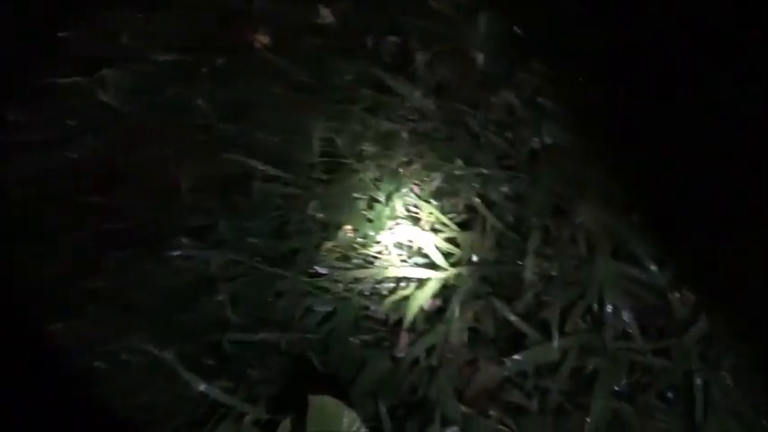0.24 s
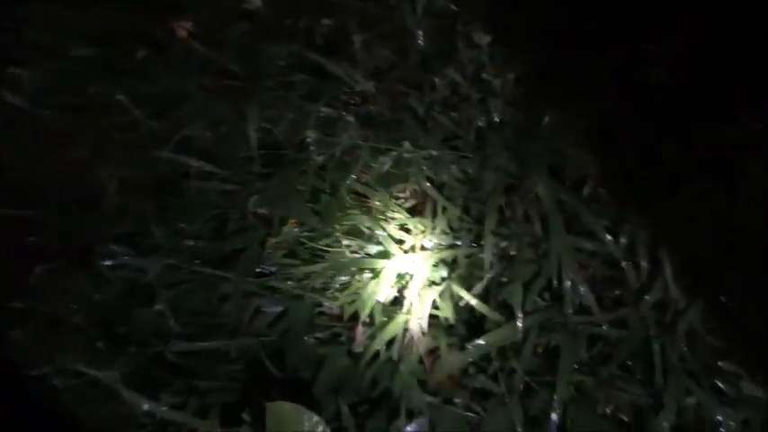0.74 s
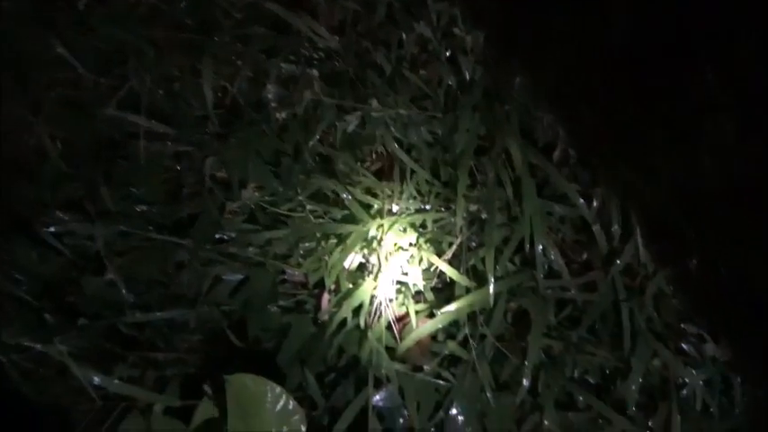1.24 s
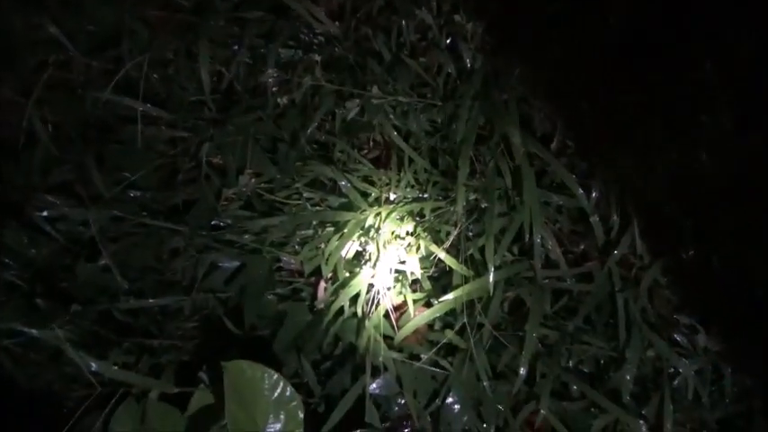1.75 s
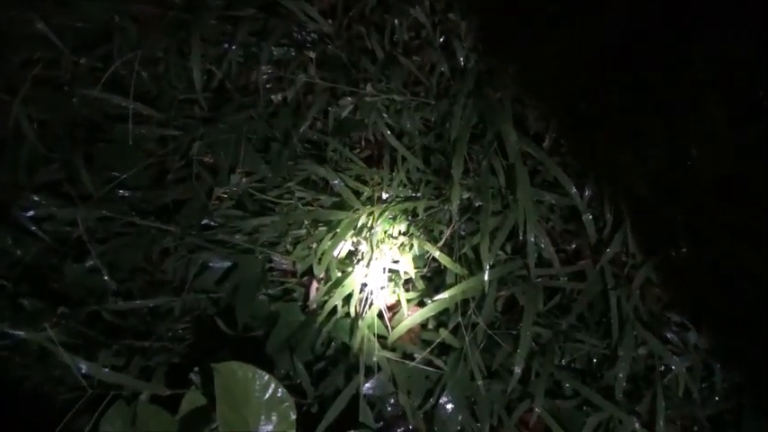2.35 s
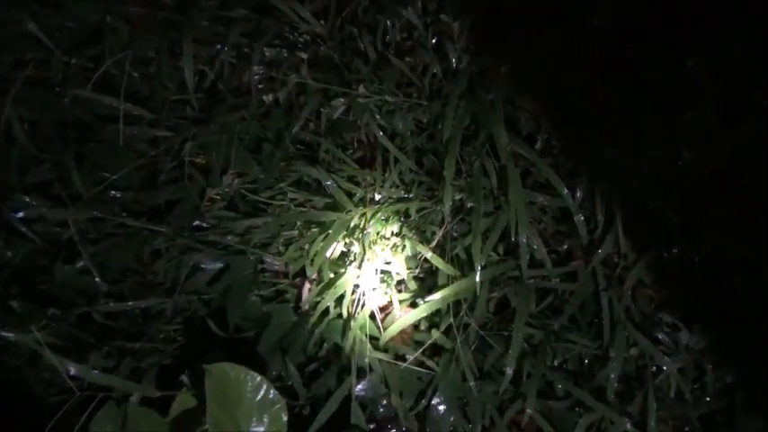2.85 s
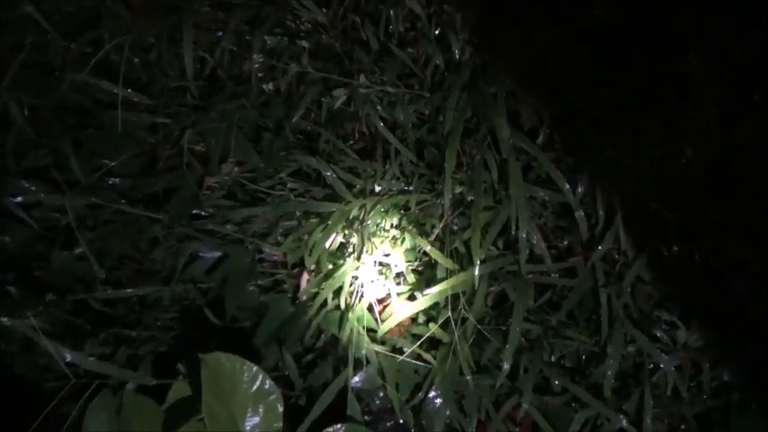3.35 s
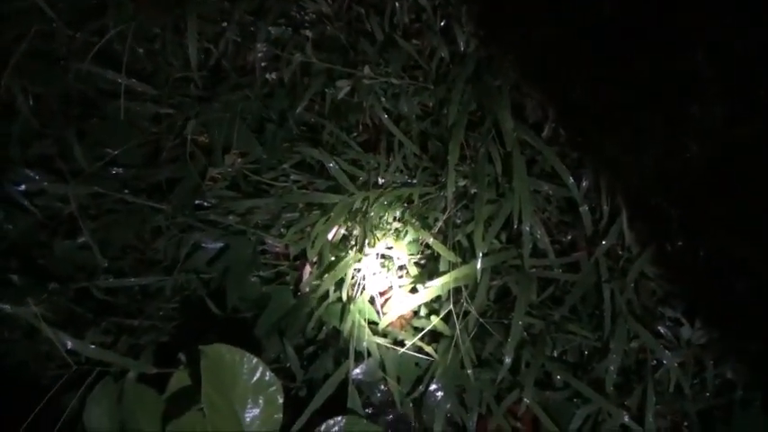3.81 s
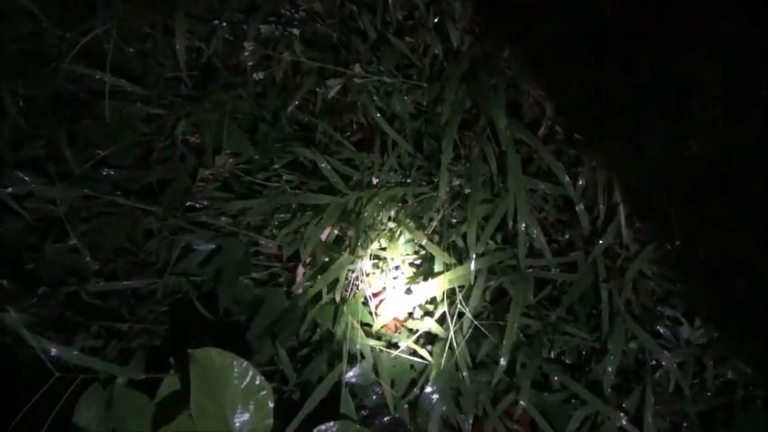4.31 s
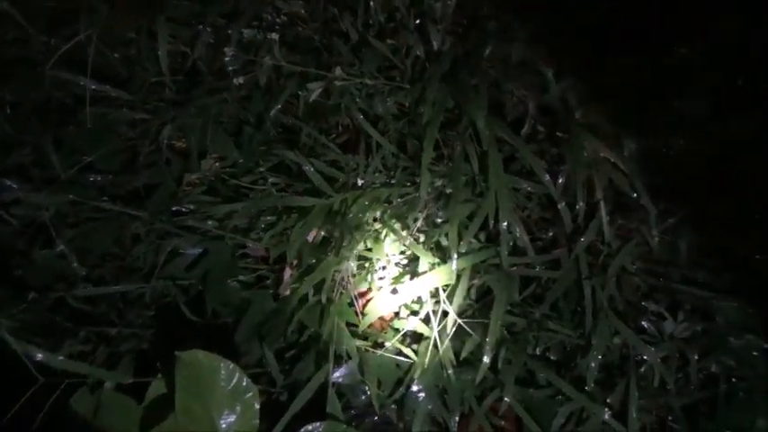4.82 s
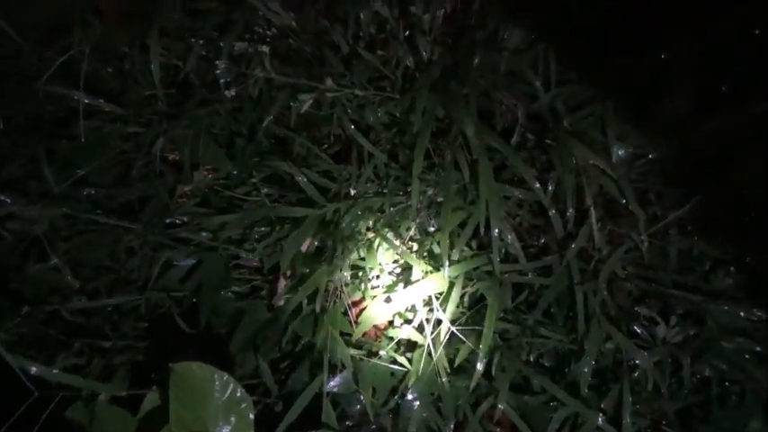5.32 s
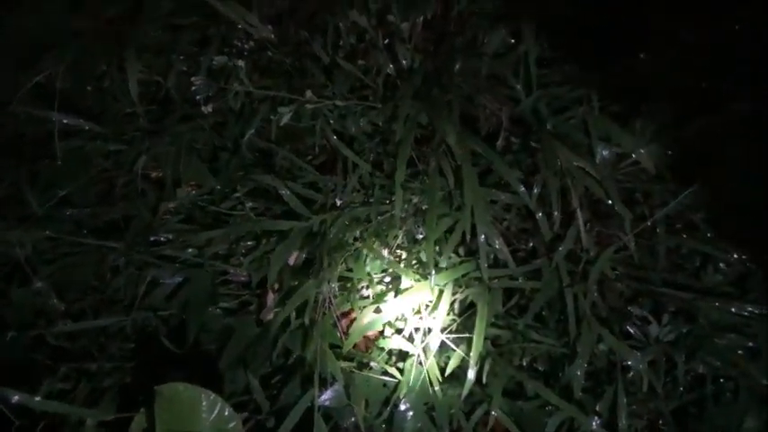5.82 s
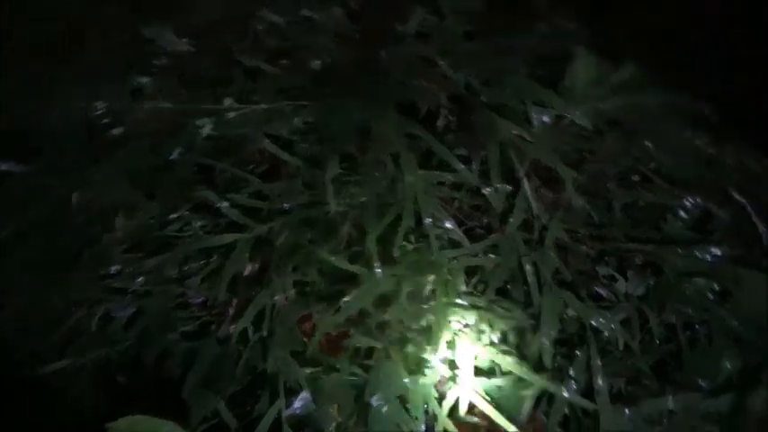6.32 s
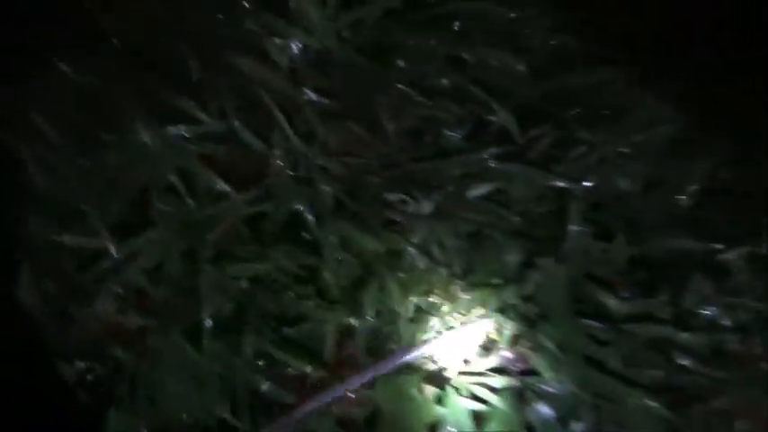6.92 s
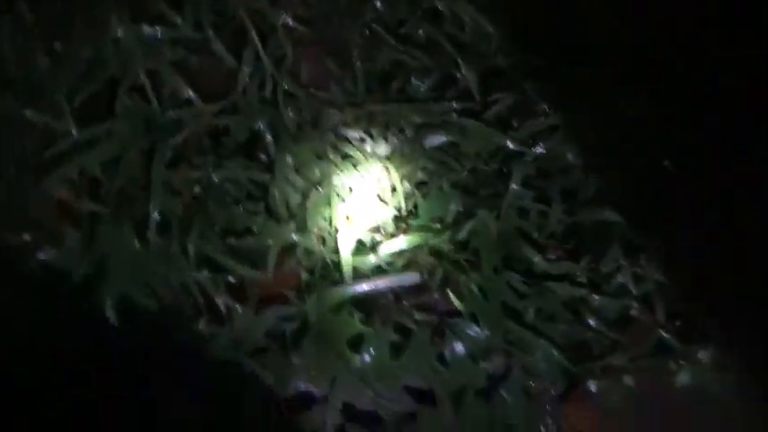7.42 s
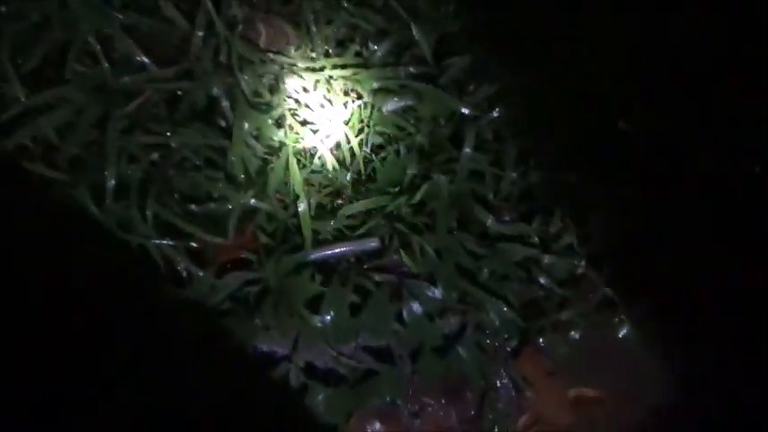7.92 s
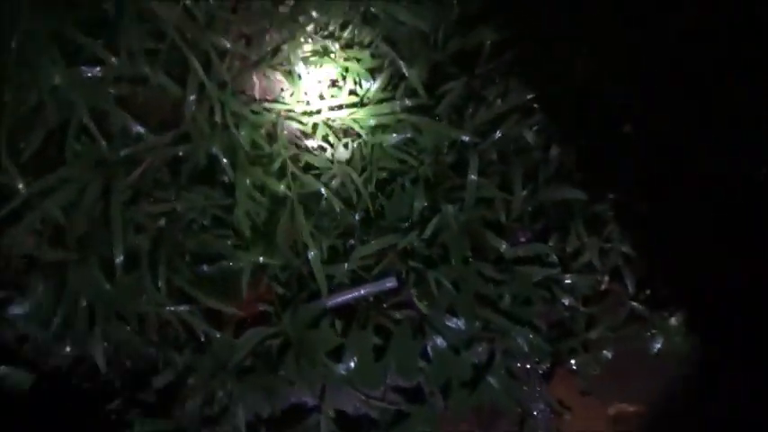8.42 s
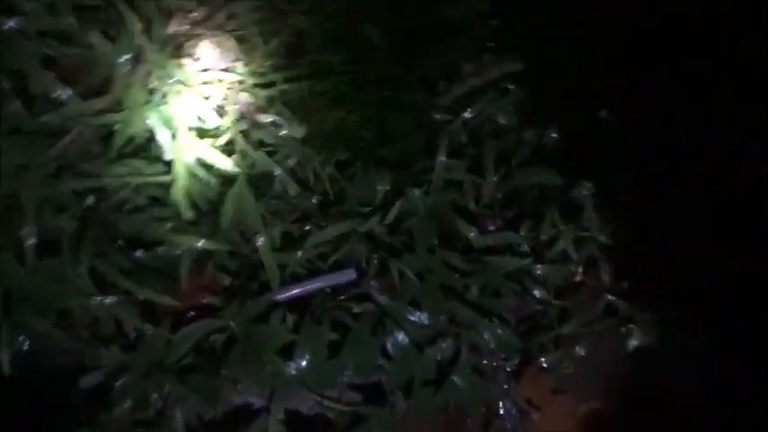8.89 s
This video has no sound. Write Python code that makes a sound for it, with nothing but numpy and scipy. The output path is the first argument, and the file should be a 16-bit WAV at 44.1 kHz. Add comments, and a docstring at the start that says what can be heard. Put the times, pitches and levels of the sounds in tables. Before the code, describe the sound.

A person stands in rain beside wet grass, the stereo microphone close to their jacket. Fine hiss and soft patter continue throughout over a faint electrical hum. Low thunder rumbles soon after the start, leaning left, with bumping claps, and a second long peal comes midway. It dwindles as drops thump on cloth, the jacket rustles abruptly, a short rumble follows, and one loud dull thud lands near the end.

```python
"""Night rain on grass and leaves from start to end: a noise wash with single drops, puddle plinks and mains hum.
From about one second thunder rolls: noise bands under peal envelopes, with claps of a few low cycles.
A second long peal follows past four seconds and a small one past seven, over a roll that slowly fades.
A rain jacket swishes in bursts of tiny slips, most strongly near seven seconds, as its wearer turns.
Fat drops thud on taut cloth as short sinking tones, near six and again past eight and a half seconds."""
import sys
import numpy as np
from scipy import signal
from scipy.fft import rfft, irfft, next_fast_len
from scipy.io import wavfile
from scipy.ndimage import uniform_filter1d, map_coordinates

SR = 44100
rng = np.random.default_rng(int(sys.argv[2]) if len(sys.argv) > 2 else 0)


def put_to_file(sound):
    """Save the sound as 16-bit audio at rate SR, in the file named by the first command-line argument."""
    columns = np.atleast_2d(sound).T  # one column per channel
    safe = np.clip(columns, -1, 1)
    whole_steps = np.round(safe * 32767)
    wavfile.write(sys.argv[1], SR, whole_steps.astype(np.int16))


N = 403515  # length in samples


def amp(db):
    """Decibels to gain."""
    return 10 ** (np.asarray(db) / 20)


def unit(x):
    """Scale to rms 1."""
    return x / np.sqrt(np.mean(x ** 2) + 1e-20)


def along(points, hz):
    """Read a (Hz, value) curve on a log frequency axis."""
    point_hz, value = np.transpose(points)
    return np.interp(np.log(hz + 1), np.log(point_hz + 1), value)


def curves(rows):
    """One value per sample for each column after the time."""
    time_s, *columns = np.transpose(rows)
    return [np.interp(np.arange(N) / SR, time_s, column) for column in columns]


def wobble(rate_hz):
    """A smooth random curve with rate_hz knots a second."""
    knots = rng.standard_normal(int(N * rate_hz / SR) + 4)
    return map_coordinates(knots, [np.arange(N) * rate_hz / SR])


def filtered(x, response):
    """Shape a sound by a response of frequency, padded so that no tail wraps round."""
    padded = next_fast_len(N + SR // 2)
    hz = np.fft.rfftfreq(padded, 1 / SR)
    return irfft(rfft(x, padded) * response(hz), padded)[..., :N]


def coloured(x, spectrum):
    """Give a sound a spectrum, at rms 1."""
    return unit(filtered(x, lambda hz: amp(along(spectrum, hz))))


def panned(db):
    """Left and right gains for a level difference; positive leans left."""
    return amp(np.outer([.5, -.5], db))


def add(track, start_s, sound):
    """Mix a sound into the track at a moment."""
    part = track[..., max(round(start_s * SR), 0):][..., :sound.shape[-1]]
    part += sound[..., :part.shape[-1]]


def swell(middle_s, length_s):
    """A bell-shaped rise and fall around a moment."""
    return np.exp(-2 * ((np.arange(N) / SR - middle_s) / length_s) ** 2)


def impacts(rate_hz, spread_db):
    """Impulses at random moments with log-normal sizes (tails clipped) and random signs, rms 1."""
    chance, size = rng.random(N), rng.standard_normal(N)
    struck = chance < rate_hz / SR
    sign = rng.choice([-1, 1], N)
    return unit(struck * amp(spread_db * np.clip(size, -2, 2)) * sign)


# mains hum partials: pitch_hz [Hz], level_db [dB]
HUM_PARTIALS = [(60, -52), (120, -45.5), (300, -51.5)]


def hum():
    """A faint mains hum: sine partials whose levels waver slightly."""
    t = np.arange(N) / SR
    return sum(amp(level_db + 0.43 * wobble(2.5)) * np.sin(2 * np.pi * pitch_hz * t)
               for pitch_hz, level_db in HUM_PARTIALS)


# how alike the rain is in both ears: pitch_hz [Hz], likeness [0 to 1]
RAIN_LIKENESS = [(60, 1), (200, 1), (400, 1), (850, 0.57), (2000, 0.49), (4900, 0.54), (9000, 0.71)]


def wash(spectrum, rate_hz, spread_db):
    """Countless drops from all around; the two microphones share only part of them."""
    pair = np.array([impacts(rate_hz, spread_db), impacts(rate_hz, spread_db)])

    def mid_side(hz):
        # less likeness turns more of the power into the side signal
        turn = np.arccos(np.clip(along(RAIN_LIKENESS, hz), 0, 1)) / 2
        return amp(along(spectrum, hz)) * [np.cos(turn), np.sin(turn)]

    mid, side = filtered(pair, mid_side)
    return unit(np.array([mid + side, mid - side]))


# strength of the rain wash, with a short swell of cloth rustle near 6.9 s, before trims:
# time_s [s], patter_db [dB], hiss_db [dB]
WASH_STRENGTH = [(0.0, -40, -41.5), (0.48, -39.5, -43), (2.83, -38, -42.5), (4.79, -39, -42.5),
                 (6.55, -38.5, -42), (6.86, -37, -37), (7.44, -38, -42.5), (9.15, -37.5, -41)]
# tone of the drops on soil and leaves: pitch_hz [Hz], level_db [dB per Hz]
PATTER_SPECTRUM = [(25, -8), (45, -1), (95, -6.5), (160, 6), (210, 1.5), (320, 1), (480, 3), (750, 2.5),
                   (1200, 2), (2000, 0), (3000, -2.5), (4200, -7), (5500, -16.5), (8000, -41)]
# tone of the drops on grass blades: pitch_hz [Hz], level_db [dB per Hz]
HISS_SPECTRUM = [(2500, -8), (4200, 0), (5100, 0.5), (5900, 1.1), (6700, 2), (8700, 2), (9800, -0.5),
                 (10700, -3), (11100, -16.5)]


def far_rain():
    """Patter on soil and leaves and a finer hiss on grass; a brief swell stands for the jacket's rustle."""
    patter_db, hiss_db = curves(WASH_STRENGTH)
    flow_db = 0.37 * wobble(2.7) + 0.5 * wobble(16)  # both layers ebb together
    patter_gain = amp(patter_db + 1.83 + flow_db + 0.49 * wobble(35))
    hiss_gain = amp(hiss_db + 1.5 + flow_db + 0.5 * wobble(30))
    patter = patter_gain * wash(PATTER_SPECTRUM, rate_hz=4000, spread_db=2.5)
    hiss = hiss_gain * wash(HISS_SPECTRUM, rate_hz=10000, spread_db=5.0)
    return patter * panned(-2.0) + hiss * panned(0.15)


def bubble(pitch_hz, t60_s, scatter):
    """A bubble rings briefly, wavering, and rises in pitch as it nears the surface."""
    t = np.arange(SR // 6) / SR
    waver = signal.resample(rng.standard_normal(150), len(t))
    glide = 1 + 0.65 * t + scatter * waver
    phase = 2 * np.pi * np.cumsum(pitch_hz * glide) / SR
    return amp(-60 * t / t60_s) * (1 - np.exp(-t / 0.002)) * np.sin(phase)


# clear plinks: start_s [s], level_db [dB], pitch_hz [Hz, at the start], t60_s [s], scatter [share of pitch]
PUDDLE_PLINKS = [(0.466, -25, 830, 0.043, .05), (0.744, -20, 510, 0.028, 0.11),
                 (2.644, -28.5, 1300, 0.13, .02), (3.324, -22, 1400, 0.036, 0.054),
                 (5.062, -30, 1450, 0.15, .04), (6.014, -25, 1360, 0.072, 0.12),
                 (6.085, -29, 726, 0.076, 0.1), (8.549, -24, 2160, .1, 0.1),
                 (8.558, -31, 3000, 0.11, 0.137), (8.573, -27, 1900, 0.12, 0.093),
                 (8.584, -31, 2016, .13, .09)]


def puddles(count=70):
    """Bubbles ring in puddles: a few clear plinks close by, and many faint ones all around."""
    out = np.zeros((2, N))
    for start_s, level_db, pitch_hz, t60_s, scatter in PUDDLE_PLINKS:
        add(out, start_s, amp(level_db) * bubble(pitch_hz, t60_s, scatter))
    starts_s = rng.random(count) * N / SR
    traits = np.clip(rng.standard_normal((count, 3)), -2, 2)
    for start_s, (size, pitch, side) in zip(starts_s, traits):
        plink = bubble(1500 * np.exp(.4 * pitch), t60_s=0.062, scatter=.05)
        add(out, start_s, amp(-37.5 + 1.5 * size) * panned(-1.5 + 3 * side) * plink)
    return out


def drop(pitch_hz, shake_db, splash_db, shake_t60_s, splash_t60_s):
    """A drop slaps and briefly shakes a leaf, through its broad resonance, and sprays droplets."""
    t = np.arange(SR // 25) / SR
    shake, spray = rng.standard_normal((2, len(t)))
    band_hz = np.clip([0.61 * pitch_hz, 1.39 * pitch_hz], 50, .45 * SR)
    leaf = signal.butter(2, band_hz, "bandpass", fs=SR, output="sos")
    slap = signal.sosfilt(leaf, signal.unit_impulse(len(t)))
    slap = 0.89 * slap / np.abs(slap).max()
    shake = unit(signal.sosfilt(leaf, shake)) * amp(shake_db - 60 * t / shake_t60_s)
    shake *= 1 - np.exp(-pitch_hz * t)  # the shake builds up after the slap
    spray = unit(np.diff(spray, prepend=0)) * amp(splash_db + 7.5 - 60 * t / splash_t60_s)
    return slap + shake + spray


# drops on near leaves: start_s [s], level_db [dB], pitch_hz [Hz, of the leaf],
# shake_db and splash_db [dB, relative to the drop, splash before its trim], pan_db [dB, left over right]
LEAF_DROPS = [(0.355, -18, 2470, -5.5, -28, -6), (0.471, -20, 1720, -12, -18, -3),
              (0.5452, -17, 6000, -16, -20, -1), (1.286, -24, 2100, -7, -24, 13),
              (1.316, -23, 2900, -5, -11.5, -10), (1.49, -18, 2100, -8, -19, -1),
              (2.829, -23, 3600, -10, -22, -3), (2.839, -19, 2800, -9, -24, -9),
              (2.9051, -19.5, 1720, -2, -28, -9), (3.3269, -21, 1440, -13, -29, 7),
              (4.043, -25.5, 7000, -2, -8, 5), (4.499, -27, 2000, -3, -18, -11),
              (5.6485, -18, 3700, -9, -26, -9), (6.052, -24, 1690, 0, -18, -3),
              (6.151, -16.5, 3000, -3.5, -11, 5), (6.563, -21.5, 4000, -14, -5.5, -1),
              (6.85, -18, 1990, -6, -28, 3), (7.333, -22, 2200, -6, -22, -3),
              (7.339, -11.5, 1840, -9, -17, -8), (7.817, -23, 5500, -10, -8, -10),
              (8.2198, -17.5, 3000, -13, -19, -7), (8.317, -19, 3300, -7, -18, -7),
              (8.772, -23, 990, -6, -24, -1), (8.9846, -17.5, 2100, -14, -25, 1)]


def near_rain(count=420):
    """Drops close enough to be heard one by one: many faint, a few sharp."""
    out = np.zeros((2, N))
    for start_s, level_db, pitch_hz, shake_db, splash_db, pan_db in LEAF_DROPS:
        hit = drop(pitch_hz, shake_db, splash_db, shake_t60_s=0.023, splash_t60_s=0.015)
        add(out, start_s, amp(level_db) * panned(pan_db) * hit)
    starts_s = rng.random(count) * N / SR
    for start_s, (size, pitch, side) in zip(starts_s, rng.standard_normal((count, 3))):
        pitch_hz = 2400 * np.exp(.5 * np.clip(pitch, -2, 2))
        hit = drop(pitch_hz, shake_db=-9, splash_db=-24, shake_t60_s=0.028, splash_t60_s=.016)
        add(out, start_s, amp(-33.5 + 3.8 * min(size, 2)) * panned(-1.5 + 2.6 * side) * hit)
    return out


# jacket strokes, before trims: middle_s [s], length_s [s], swish_db [dB], scrape_db [dB]
JACKET_STROKES = [(1.026, 0.025, -33, -41), (1.492, 0.0088, -34, -37), (2.525, 0.1, -38, -54),
                  (6.754, 0.073, -33, -58), (6.913, 0.027, -25.5, -31), (6.935, 0.0042, -22, -18),
                  (6.9425, 0.0013, -12, -14), (6.958, 0.032, -21.5, -22), (7.33, 0.17, -44, -60),
                  (8.553, 0.012, -34, -34)]
# tone of the light swish: pitch_hz [Hz], level_db [dB per Hz]
SWISH_SPECTRUM = [(2000, -21), (4000, -4), (6000, 0.5), (7500, 3), (8900, 8), (10000, 2), (11200, -5)]
# tone of the harder scrape: pitch_hz [Hz], level_db [dB per Hz]
SCRAPE_SPECTRUM = [(300, -15), (750, -9), (1120, 1), (1550, -11.5), (2300, -6.5), (3200, -12), (4500, -9),
                   (7000, -46), (11000, -35)]


def jacket():
    """Cloth slides in dense, tiny slips: light strokes swish, a hard one also scrapes."""
    swish_gain, scrape_gain = np.zeros(N), np.zeros(N)
    for middle_s, length_s, swish_db, scrape_db in JACKET_STROKES:
        stroke = swell(middle_s, length_s)
        swish_gain += amp(swish_db - 1.0) * stroke
        scrape_gain += amp(scrape_db - 4.5) * stroke
    swish = coloured(impacts(rate_hz=14000, spread_db=6), SWISH_SPECTRUM)
    scrape = coloured(impacts(rate_hz=6000, spread_db=3.5), SCRAPE_SPECTRUM)
    return swish_gain * swish + scrape_gain * scrape


# fat drops on taut cloth: start_s [s], level_db [dB], pitch_hz [Hz, once settled], t60_s [s],
# splash_db [dB, relative to the thud, before its trim]
CLOTH_THUDS = [(6.06, -13, 360, 0.057, -22), (6.07, -21, 540, 0.051, -24), (8.545, -4, 337, 0.016, -18.5),
               (8.566, -17.5, 340, 0.033, -18)]


def fat_drops():
    """Dull thuds on taut cloth, sinking in pitch at once, each with a little splash of noise."""
    out, t = np.zeros(N), np.arange(SR // 6) / SR
    for start_s, level_db, pitch_hz, t60_s, splash_db in CLOTH_THUDS:
        sag = 1 + .5 * np.exp(-t / 0.0011)  # the cloth is tightest at the blow
        phase = 2 * np.pi * np.cumsum(pitch_hz * sag) / SR
        body = np.sin(phase) * amp(-60 * t / t60_s) * (1 - np.exp(-t / 0.00038))
        splash = amp(splash_db + 3.5 - 60 * t / 0.018) * rng.standard_normal(len(t))
        add(out, start_s, amp(level_db) * (body + splash))
    return out


def peal(start_s, rise_s, hold_s, fade_db_per_s):
    """A gain that rises, holds and dies away."""
    age = np.arange(N) / SR - start_s
    return np.clip(age / rise_s, 0, 1) * amp(-fade_db_per_s * np.maximum(age - rise_s - hold_s, 0))


# peals of thunder: start_s [s], rise_s [s], hold_s [s], fade_db_per_s [dB per s], level_db [dB, before
# the layer trims], depth_db and tearing_db [dB, added to the level], pan_db [dB, left over right]
THUNDER_PEALS = [(0.904, 0.22, 0.045, 56, -21, 1, 2.5, -3.5), (1.223, 0.037, 0.55, 31, -26, 2.5, 3, -5),
                 (2.053, 0.09, 0.055, 64, -25.5, 4, 3.5, -5), (2.337, 0.031, 0.036, 45, -34.5, 9.5, 7, -8),
                 (2.825, 0.13, 0.13, 56, -29, 2.5, 6.5, -4.5), (3.247, 0.033, 0.14, 46, -45, 7, 12.5, -6),
                 (4.147, 0.074, .03, 32, -24.5, -4.5, 2.5, -3.5),
                 (4.464, 0.045, .02, 60, -24, 1.5, 3, -3.5), (4.6, .06, 0.053, 68, -20.5, -2, 0, -6.5),
                 (4.863, 0.12, 0.043, 57, -20, 2, 4.5, -3), (5.133, 0.046, 0.076, 25, -25, 4, 6, -4.5),
                 (5.477, 0.041, 0.062, 62, -30.5, 7, 5, -4), (6.45, 0.28, 0.45, 10, -45.5, 5.5, -8, 3),
                 (7.11, 0.076, .07, 45, -27, -3.5, 2.5, -6), (8.03, 0.034, .02, 80, -34, -6, 0, -1),
                 (8.28, 0.047, .01, 94, -34, 0, -6, -1.5), (8.43, 0.044, .01, 90, -26, -7.5, -5, -2)]
# the long roll beneath the peals
ROLL_START_S, ROLL_RISE_S, ROLL_HOLD_S, ROLL_FADE_DB_PER_S = 0.7, 0.29, 4.4, 2.64
ROLL_DB, ROLL_DEPTH_DB, ROLL_TEARING_DB, ROLL_PAN_DB = -33.5, -1.5, 4, -1.3
LUMP_HZ, LUMP_DB = 18, 1.3  # how fast and how far the thunder heaves


def roll():
    """Peals add in power over the long roll: gains of deep rumble, boom and tearing, and a mean bearing."""
    beneath = (ROLL_START_S, ROLL_RISE_S, ROLL_HOLD_S, ROLL_FADE_DB_PER_S,
               ROLL_DB, ROLL_DEPTH_DB, ROLL_TEARING_DB, ROLL_PAN_DB)
    power, bearing = np.zeros((3, N)), np.zeros(N)
    for start_s, rise_s, hold_s, fade, level_db, depth_db, tearing_db, pan_db in [beneath, *THUNDER_PEALS]:
        layer_gains = amp([level_db + depth_db, level_db, level_db + tearing_db])
        share = np.outer(layer_gains, peal(start_s, rise_s, hold_s, fade)) ** 2
        power += share
        bearing += pan_db * share.sum(axis=0)
    deep, boom, tearing = (np.sqrt(p) * amp(LUMP_DB * wobble(LUMP_HZ)) for p in power)
    bearing_db = bearing / (power.sum(axis=0) + 1e-20)  # the loudest peal weighs most
    return deep, boom, tearing, bearing_db


def rumble(spectrum, evenness):
    """Overlapping shock waves, dulled by distance; evenness 1 levels them into one even roll."""
    waves = coloured(impacts(rate_hz=900, spread_db=1.5), spectrum)
    power = np.abs(uniform_filter1d(waves ** 2, int(.06 * SR))) + 1e-4
    return unit(waves / power ** (np.clip(evenness, 0, 1) / 2))


# the strongest claps within the peals: time_s [s], level_db [dB, before the trim], pitch_hz [Hz, on average]
THUNDER_CLAPS = [(1.129, -3, 178), (1.159, -8, 162), (1.206, -3, 204), (1.36, -17, 150), (1.476, -1, 160.5),
                 (1.656, -5.5, 183), (1.717, -6, 186), (1.784, -1.5, 200), (2.086, -9, 214),
                 (2.387, -13, 206), (2.42, -12, 105), (2.521, -11.5, 205), (4.495, -4.5, 168),
                 (4.521, -5.5, 158), (4.641, -7, 173), (4.692, -6, 193), (4.914, -4, 184.5),
                 (4.955, -1.5, 198), (5, -7, 184), (5.04, -4, 188), (5.219, -8, 186), (7.188, -10, 254),
                 (7.237, -6.5, 248)]
# tone of the deep rumble: pitch_hz [Hz], level_db [dB per Hz]
DEEP_SPECTRUM = [(12, -53), (20, -25), (60, -8), (113, -5), (173, 2.5), (201, -2), (260, -10.5), (340, -52),
                 (570, -120)]
# tone of the boom: pitch_hz [Hz], level_db [dB per Hz]
BOOM_SPECTRUM = [(130, -56), (180, -8), (210, 0), (255, -1.5), (290, -8.5), (330, -29), (480, -51.5)]
# tone of the tearing: pitch_hz [Hz], level_db [dB per Hz]
TEARING_SPECTRUM = [(220, -19.5), (295, -3), (335, 0), (410, -4), (490, -10), (700, -16.5), (1000, -26),
                    (1800, -76)]


def thunder():
    """A long, tearing roll, with claps of a few low cycles from nearer bends of the lightning channel."""
    deep, boom, tearing, bearing_db = roll()
    direct = amp(0.3) * deep * rumble(DEEP_SPECTRUM, evenness=1.0)
    direct += amp(-3.0) * boom * rumble(BOOM_SPECTRUM, evenness=0.14)
    direct += amp(-11.0) * tearing * rumble(TEARING_SPECTRUM, evenness=0.14)
    t = np.arange(SR // 8) / SR
    age = t / 0.011  # a clap swells to its peak in 11 ms
    envelope = (age * np.exp(1 - age)) ** 2.0
    for time_s, level_db, pitch_hz in THUNDER_CLAPS:
        waver = 1 + 0.08 * wobble(188)[:len(t)]
        phase = 2 * np.pi * np.cumsum(pitch_hz * waver) / SR
        add(direct, time_s - .004, amp(level_db - 7.0) * envelope * np.sin(phase))
    # what the land scatters arrives from the sides, more of it at higher pitch
    scattered = amp(-27.5) * deep * rumble(DEEP_SPECTRUM, evenness=.3)
    scattered += amp(-22.5) * boom * rumble(BOOM_SPECTRUM, evenness=0.25)
    scattered += amp(-19) * tearing * rumble(TEARING_SPECTRUM, evenness=.3)
    return direct * panned(bearing_db) + np.array([scattered, -scattered])


def scene():
    """Everything in the open air, with no walls to answer."""
    return hum() + far_rain() + puddles() + near_rain() + jacket() + fat_drops() + thunder()


TOP_HZ = 11150


def record(dry):
    """The microphone keeps nothing above its band limit."""
    return filtered(dry, lambda hz: hz < TOP_HZ)


dry = scene()
out = record(dry)
put_to_file(out)
```